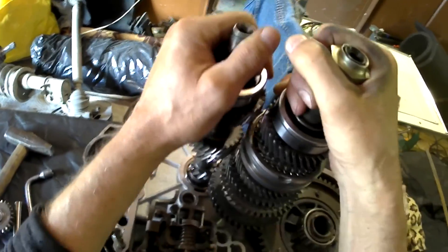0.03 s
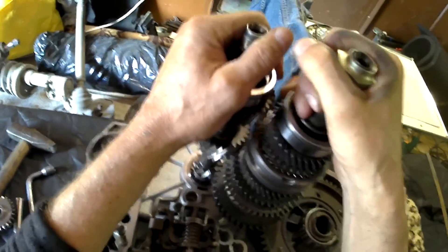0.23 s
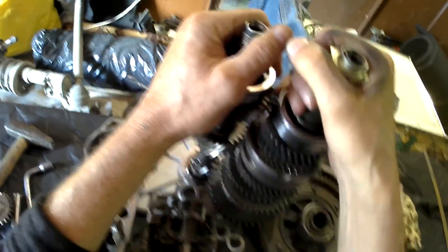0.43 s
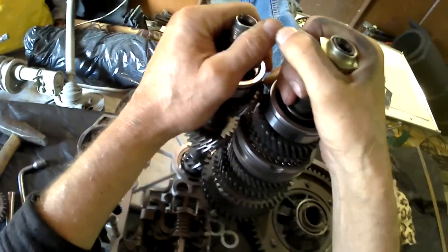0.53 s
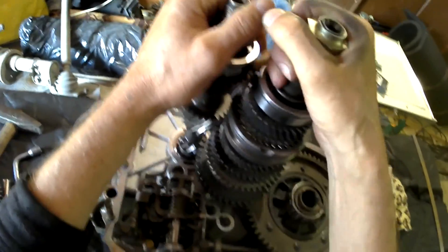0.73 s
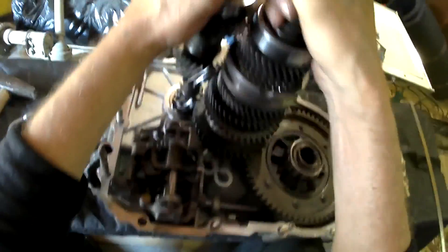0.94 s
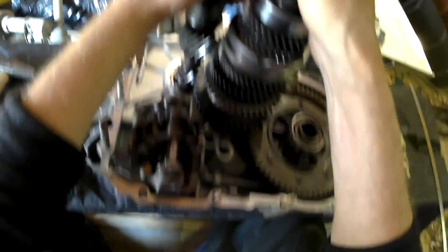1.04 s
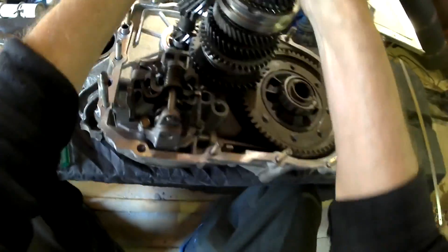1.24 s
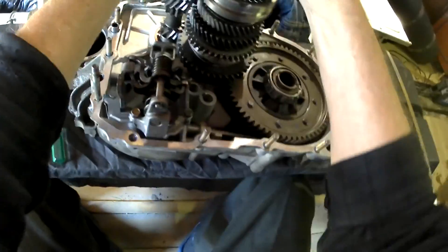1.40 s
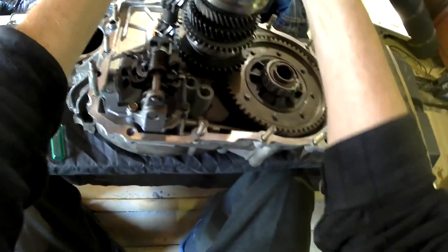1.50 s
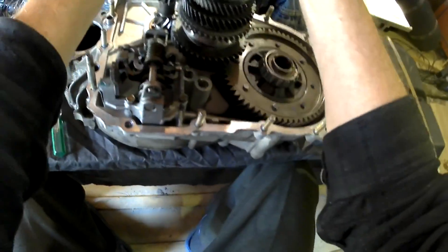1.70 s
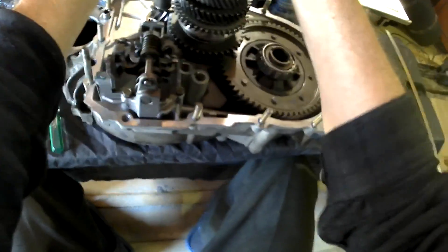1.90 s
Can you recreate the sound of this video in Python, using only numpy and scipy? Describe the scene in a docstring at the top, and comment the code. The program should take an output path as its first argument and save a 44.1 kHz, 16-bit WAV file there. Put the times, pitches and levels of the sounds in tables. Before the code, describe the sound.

Metal gear shafts clatter into a gearbox housing, very close. Soft knocks at the start lead to a dense, distorted burst of bangs and scraping from 0.2 to 0.45 seconds, with a short hollow ring. Single knocks follow at 0.6 and 0.7, duller thuds around 0.95, a clink near 1.26, then a light cluster around 1.65-1.75. Low rumble and faint workshop noise lie beneath; treble is muffled.

```python
"""Two heavy gear shafts are worked down into an open aluminium gearbox housing on a workshop bench.
They slide, drop close to the microphone with a loud clatter that overloads, then knock and clink as they are
wiggled into their seats. Each contact rings decaying modes of housing and gears; slides are dense random slips.
The moving arms stir a low rumble at the microphone, shaped noise over a steady workshop background."""
import sys
import numpy as np
from scipy import signal
from scipy.fft import rfft, irfft
from scipy.io import wavfile

SR = 44100
rng = np.random.default_rng(int(sys.argv[2]) if len(sys.argv) > 2 else 0)


def unload_wav(signal):
    """Save mono or channel-first audio to the path in sys.argv[1] as 16-bit WAV at rate SR, clipped to [-1, 1]."""
    wavfile.write(
        sys.argv[1],
        SR,
        np.round(np.clip(np.atleast_2d(signal).T, -1, 1) * 32767).astype(np.int16),
    )


N = 85995   # length [samples]
RING_S = .7   # each ring is cut off after this time
CLINK_HZ = 1985   # lower edge of the clink


def from_db(db):
    """Amplitude factor of a level in dB."""
    return 10 ** (np.asarray(db) / 20)


def rms_one(x):
    """Scale to rms 1."""
    return x / np.sqrt(np.mean(x ** 2) + 1e-20)


def noise(spectrum, size):
    """Random-phase noise with the given spectrum, rms 1."""
    hz, db = np.transpose(spectrum)
    bins = np.maximum(np.arange(size // 2 + 1) * SR / size, 1)
    gain = from_db(np.interp(np.log(bins), np.log(hz), db))
    phases = np.exp(2j * np.pi * rng.random(len(bins)))
    return rms_one(irfft(gain * phases, size))


def fade(t, t60_s):
    """Exponential decay that falls 60 dB in t60_s."""
    return np.exp(-np.log(1000) * t / t60_s)


def split(x, hz):
    """Low and high parts of a crossover that sums flat: each filter is applied twice."""
    pair = [signal.butter(2, hz, kind, fs=SR, output="sos") for kind in ("low", "high")]
    return [signal.sosfilt(np.vstack([sos, sos]), x + 1e-18) for sos in pair]


def add(out, s, x):
    """Mix x in at time s."""
    start = max(int(s * SR), 0)
    out[start:start + len(x)] += x[:max(N - start, 0)]


# Shafts striking the housing, close to the microphone:
# (time [s], ring level [dB], thud relative to the ring [dB], upper reach of the thud [Hz],
#  clink relative to the ring [dB], level of the housing's deep boom [dB])
SHAFT_CONTACTS = [(0.001, -18.5, 12, 400, -3.5, -27.5), (0.028, -24.5, 15.5, 400, -14, -37.5),
                  (0.144, -13.5, 3, 700, 1.5, -54), (0.22, -1.5, -0.5, 844, -9.5, -43),
                  (0.237, 6, -0.5, 800, -2, -27.5), (0.253, -0.5, -2.5, 800, 4.5, -43),
                  (0.2627, 8.5, -13, 800, 0, -25.5), (0.285, 5, -9, 800, -15, -31.5),
                  (0.317, 6.5, -13.5, 850, 2, -39), (0.3319, 9.5, -33, 850, 1.5, -32),
                  (0.337, 5, -16, 850, 12.5, -34), (0.3711, 13.5, -9.5, 850, 2, -34),
                  (0.386, 7, 0, 850, -12, -15), (0.407, -1.5, 0, 850, 1.5, -11.5),
                  (0.42, 1.5, 0.5, 850, -2.5, -24.5), (0.581, -11.5, 0.5, 850, 1.5, -24.5),
                  (0.625, -21, 13, 850, -6.5, -41.5), (0.649, -22.5, 10.5, 750, -23, -22.5),
                  (0.698, -12, -3.5, 800, -11.5, -28.5), (0.765, -28.5, 8.5, 750, -34, -39),
                  (0.812, -34, 23.5, 420, -10, -33), (0.926, -22.5, 17.5, 620, -13, -36),
                  (0.9392, -13.5, 14, 600, -4, -22.5), (0.972, -17, 15, 520, 3.5, -51.5),
                  (1.059, -33, 17.5, 480, -1.5, -33.5), (1.174, -39.5, 25.5, 450, -5.5, -51),
                  (1.257, -9.5, 6.5, 480, 4.5, -23), (1.266, -15, 6, 460, -1, -32),
                  (1.285, -32.5, 0, 500, 2.5, -49), (1.304, -22, -6, 500, 4.5, -59.5),
                  (1.631, -48, 12.5, 700, -36, -50.5), (1.654, -19, 14, 550, -7.5, -33.5),
                  (1.669, -21.5, 16, 680, 1, -29), (1.68, -27, 8, 380, -7, -19.5),
                  (1.694, -21, 7.5, 700, 5, -35), (1.7096, -10, 1, 700, 3, -30),
                  (1.725, -16.5, 3.5, 800, -4, -48), (1.743, -30, 17.5, 700, 0, -46),
                  (1.763, -33.5, 14, 700, 13.5, -49), (1.825, -38.5, 22, 750, -5, -29),
                  (1.911, -34, 12.5, 750, -32, -38)]
BOUNCE_DELAY_S, BOUNCE_LOSS_DB = .004, 11.5   # mean delay; each contact chatters briefly


def knocks():
    """Each contact is a blow, a weaker bounce just after it and a push on the whole housing."""
    out = np.zeros(N)
    for s, db, thud_db, thud_hz, clink_db, boom_db in SHAFT_CONTACTS:
        blow = from_db(db) * gearbox(thud_db, thud_hz, clink_db)
        push = from_db(boom_db) * boom()
        add(out, s, blow + push)
        bounce = from_db(db - BOUNCE_LOSS_DB) * gearbox(thud_db, thud_hz, clink_db)
        add(out, s + BOUNCE_DELAY_S * (.5 + rng.random()), bounce)
    return out


# Walls of the housing: (frequency [Hz], relative level [dB], t60 [s])
HOUSING_MODES = [(335, -18, .16), (366, -20, .17), (431, -23, .15), (535, -20, .17), (566, -23, .16),
                 (630, -22, .16), (661, -21, .14), (1083, -21, .18), (1118, -21, .15), (1175, -16, .19),
                 (1378, -22, .13), (1425, -18, .2), (1624, -22, .15)]
# Shafts and gears: (frequency [Hz], relative level [dB], t60 [s])
GEAR_MODES = [(1247, -24, .14), (1475, -24, .12), (1565, -23, .14), (1725, -24, .1), (1832, -24, .14),
              (2172, -27, .12), (2238, -28, .11), (2515, -30, .12), (2740, -30, .09), (2935, -30, .1),
              (3170, -34, .09)]
# MODES_DB shifts all modes; each contact meets them differently, and the moving shafts load them
MODES_DB, MODE_SPREAD_DB, MODE_DETUNE = -1, 2, .003   # detune is a fraction of the frequency
# Crowd of short-lived modes of the casting: (frequency [Hz], relative level [dB])
CRACK_SPECTRUM = [(100, -27), (250, -6.5), (370, -3.5), (600, 5), (880, -3), (1150, 0), (1500, 5),
                  (2000, -9.5), (2900, -11.5), (3800, -24)]
CRACK_DB, CRACK_T60_S = -8, 0.059
ROOM_DB, ROOM_T60_S, ROOM_TREBLE_T60_S = -24.5, 0.38, 0.25


def gearbox(thud_db, thud_hz, clink_db):
    """Answer to one touch: clear modes, a crack of crowded modes and the room, coloured by the place of contact."""
    t = np.arange(int(RING_S * SR)) / SR
    hz, db, t60 = np.transpose(HOUSING_MODES + GEAR_MODES)
    hz = hz * (1 + MODE_DETUNE * rng.standard_normal(len(hz)))
    level_db = MODES_DB + db + MODE_SPREAD_DB * rng.standard_normal(len(hz))
    strength = from_db(level_db) * rng.choice([-1, 1], len(hz))
    modes = strength @ (np.sin(2 * np.pi * hz[:, None] * t) * fade(t, t60[:, None]))

    crack = from_db(CRACK_DB) * noise(CRACK_SPECTRUM, len(t)) * fade(t, CRACK_T60_S)
    dull, bright = split(noise(CRACK_SPECTRUM, len(t)), CLINK_HZ)
    room = from_db(ROOM_DB) * (dull * fade(t, ROOM_T60_S) + bright * fade(t, ROOM_TREBLE_T60_S))

    thud, rest = split(modes + crack + room, thud_hz)
    ring, clink = split(rest, CLINK_HZ)
    return from_db(thud_db) * thud + ring + from_db(clink_db) * clink


BOOM_HZ, BOOM_T60_S = 180.6, 0.39   # the whole housing flexes on the bench
BOOM_DETUNE = .012   # fraction of the pitch, which shifts with the weight resting on the housing


def boom():
    """The deepest mode of the housing, one decaying sine."""
    t = np.arange(int(RING_S * SR)) / SR
    hz = BOOM_HZ * (1 + BOOM_DETUNE * rng.standard_normal())
    return np.sin(2 * np.pi * hz * t) * fade(t, BOOM_T60_S)


# Shafts slide and gear teeth rake past each other, close to the microphone:
# (start [s], end [s], level half a swell above the end [dB], swell on the way [dB],
#  thud relative to the ring [dB])
SHAFT_SLIDES = [(0.19, 0.226, -19.5, 9.5, 9.5), (0.281, 0.36, -7, 8, -23.5), (0.371, 0.427, -7, -7.5, -0.5),
                (0.87, 0.922, -34, 4, -2.5), (1.237, 1.242, -24, 6.5, 5.5), (1.287, 1.322, -41.5, -4, 11),
                (1.649, 1.755, -45.5, 0.5, 12.5)]
SLIPS_PER_S, SLIDE_CLINK_DB = 900, -5.5
SLIDE_THUD_HZ = 790   # upper reach of a slide's thud


def slides():
    """Dense tiny slips of steel on metal ring the gearbox, swelling or easing along each slide."""
    out, t = np.zeros(N), np.arange(N) / SR
    for start, end, db, swell_db, thud_db in SHAFT_SLIDES:
        along = (t - start) / (end - start)
        sliding = (along > 0) & (along < 1)
        slips = (rng.random(N) < SLIPS_PER_S / SR) * rng.standard_normal(N) * sliding
        # from 1.5 swells below the listed level to half a swell below it
        force = slips * from_db(db + swell_db * (np.clip(along, 0, 1) - 1.5))
        out += signal.fftconvolve(force, gearbox(thud_db, SLIDE_THUD_HZ, SLIDE_CLINK_DB))[:N]
    return out


# Low rumble stirred at the microphone by the moving arms: (time [s], level before RUMBLE_DB [dB])
RUMBLE_COURSE = [(0.0, -19), (0.118, -32), (0.308, -17.5), (0.336, -31), (0.476, -10), (0.542, -29),
                 (0.678, -26.5), (0.716, -33.5), (0.776, -22.5), (0.862, -40), (1.248, -32.5), (1.542, -38),
                 (1.564, -36), (1.95, -37)]
# Its spectrum: (frequency [Hz], relative level [dB])
RUMBLE_SPECTRUM = [(10, -8.5), (20, 0.5), (30, -6), (44, -15.5), (72, -22.5), (105, -25.5), (160, -23.5),
                   (300, -29), (600, -79.5)]
RUMBLE_DB = 1   # added to the whole course


def rumble():
    """Movement at the microphone: slow, lumpy pressure swings."""
    s, db = np.transpose(RUMBLE_COURSE)
    level_db = RUMBLE_DB + np.interp(np.arange(N) / SR, s, db)
    return from_db(level_db) * noise(RUMBLE_SPECTRUM, N)


# Workshop around the bench: (frequency [Hz], relative level [dB])
WORKSHOP_SPECTRUM = [(40, 6), (150, -2.5), (500, -1), (900, -7.5), (1400, -12.5), (2100, -18), (2800, -28),
                     (3800, -32.5)]
WORKSHOP_DB = -40.5


def workshop():
    """Steady background of the workshop: noise, strongest in the bass."""
    return from_db(WORKSHOP_DB) * noise(WORKSHOP_SPECTRUM, N)


def scene():
    """Knocks and slides over rumble and the workshop background."""
    return (knocks() + slides() + rumble() + workshop())[None]


# levels are amplitudes (full scale = 1)
LOW_PASS_HZ, OVERLOAD_LEVEL, OVERLOAD_HARDNESS, CLIP_LEVEL = 3755, 0.66, 7.25, 0.67
CUTOFF_HZ = 15800


def record(dry):
    """The sound overloads softly, passes a steep low-pass near 3.8 kHz, then peaks clip and the top is cut."""
    # the 1.5 also lowers quiet sound by about half a dB
    drive = np.abs(dry / OVERLOAD_LEVEL) ** OVERLOAD_HARDNESS
    saturated = dry / (1.5 + drive) ** (1 / OVERLOAD_HARDNESS)
    hz = np.arange(N + 1) * SR / (2 * N)
    low_pass = 1 / np.sqrt(1 + (hz / LOW_PASS_HZ) ** 40)
    narrowed = irfft(rfft(saturated, 2 * N) * low_pass)[:, :N]
    clipped = np.clip(narrowed, -CLIP_LEVEL, CLIP_LEVEL)
    top_cut = signal.cheby2(16, 80, CUTOFF_HZ + 600, fs=SR, output="sos")   # 80 dB down at its edge
    return signal.sosfilt(top_cut, clipped)


dry = scene()
out = record(dry)
unload_wav(out)
```